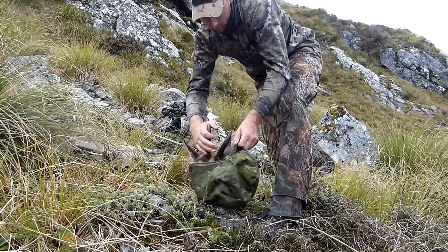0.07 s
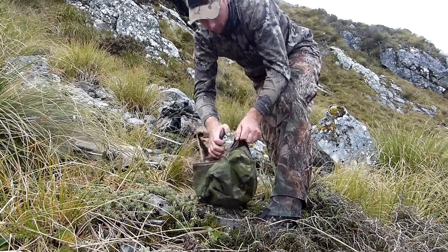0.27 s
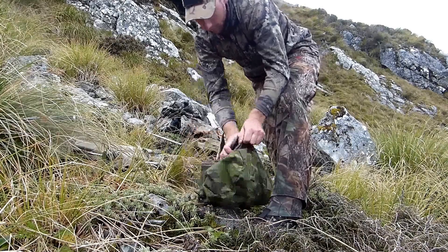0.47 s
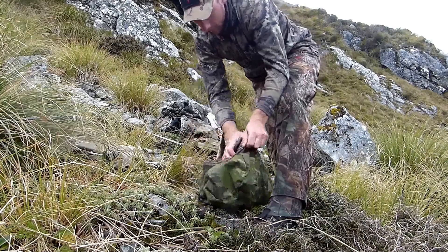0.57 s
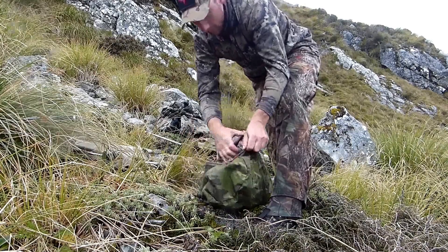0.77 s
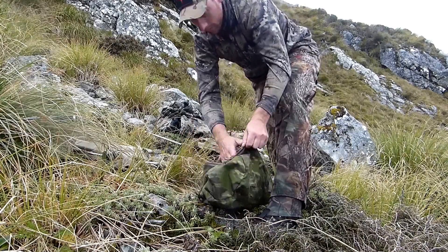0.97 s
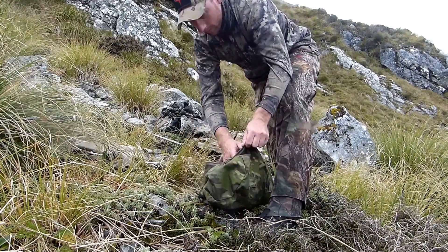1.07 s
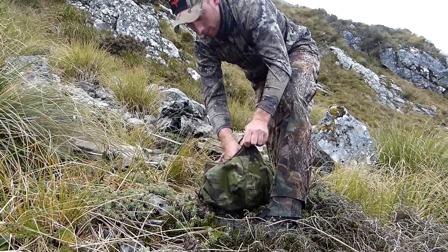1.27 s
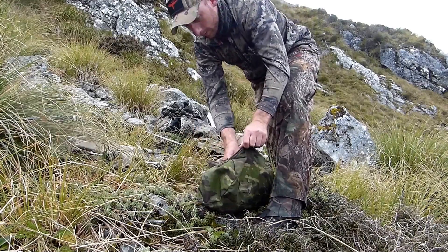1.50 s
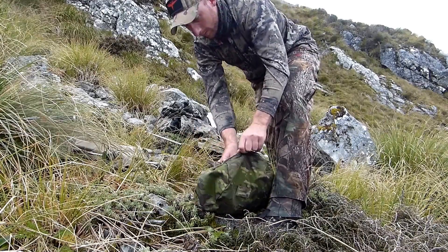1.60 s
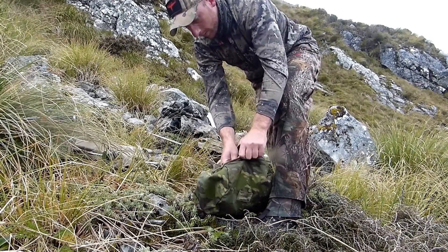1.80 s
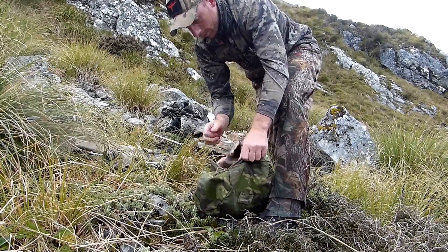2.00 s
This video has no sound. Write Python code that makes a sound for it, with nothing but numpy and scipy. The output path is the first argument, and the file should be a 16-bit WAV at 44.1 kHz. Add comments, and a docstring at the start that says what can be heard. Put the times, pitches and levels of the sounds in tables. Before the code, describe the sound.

A stiff fabric pack rustles as it is pulled shut a few steps away. Cloth slides in several strokes, a strap rasps briefly, then the load bumps dully and creases tick, in almost still mountainside air.

```python
"""Closing a fabric pack

A stiff pack is pulled shut a few steps away on an open mountainside, in almost still air.
Cloth slides on cloth in several strokes; its folds catch and slip, exciting the hollow of the pack.
Creases and dry grass tick, the load bumps dully and a strap rasps through once."""
import sys
import numpy as np
from scipy import signal
from scipy.fft import rfft, irfft, next_fast_len
from scipy.io import wavfile
from scipy.ndimage import map_coordinates

SR = 44100
rng = np.random.default_rng(int(sys.argv[2]) if len(sys.argv) > 2 else 0)


def store_wav(level_fs):
    """Save 16-bit WAV to argv[1]."""
    pcm = np.round(np.clip(np.atleast_2d(level_fs), -1, 1) * 32767)
    wavfile.write(sys.argv[1], SR, pcm.T.astype(np.int16))


N = 90404

# Spectral shapes of the air and of each kind of rubbing: frequency_hz, relative_db
AIR_SPECTRUM = [(25, -5), (60, -15), (150, -4), (300, -5), (400, 0.5), (500, 1), (750, 6), (1050, -4),
                (1500, -8), (3000, -19), (6000, -15), (11000, -17.5), (15500, -28)]
WEAVE_SPECTRUM = [(300, -101), (900, 14), (1500, -16), (2600, -1.5), (4000, 0), (6000, 0.5), (9000, -1.5),
                  (12000, -7.5), (14000, -16), (15700, -43)]
FOLD_SPECTRUM = [(60, -56), (110, -25.5), (175, -8.5), (310, -6), (470, -3), (620, -0.5), (820, -2),
                 (1030, -9), (1350, -5.5), (2000, -13.5), (4000, -18), (9000, -49)]
CREASE_SPECTRUM = [(300, -37), (700, 4), (1250, -2.5), (1850, 0), (2400, -8), (3300, -12), (4500, -24),
                   (12000, -38)]
STRAP_SPECTRUM = [(1000, -31), (3700, -19), (4170, 1.5), (4450, -13), (4750, -7), (6000, -13.5),
                  (8000, -23), (14000, -42)]
# Envelopes of the sliding weave and the tugged folds: time_s, relative_db
SLIDE_ENVELOPE = [(0, -71), (.15, -70), (.22, -58), (.28, -53), (.305, -46.5), (.41, -45.3), (.455, -58),
                  (.52, -60), (.585, -54), (.62, -57), (.72, -57), (.745, -67), (.795, -67), (.82, -58),
                  (.91, -55.7), (1.0, -61.5), (1.04, -59), (1.1, -67), (1.165, -68), (1.2, -57.5),
                  (1.3, -57), (1.345, -52), (1.435, -52), (1.465, -54), (1.49, -48), (1.52, -46),
                  (1.585, -50), (1.63, -57), (1.73, -65), (1.88, -64), (1.95, -69), (2.05, -69)]
TUG_ENVELOPE = [(0, -61.5), (.15, -59), (.25, -48.5), (.33, -46.5), (.4, -42), (.45, -47), (.52, -51.5),
                (.585, -44), (.68, -51.5), (.715, -46.5), (.76, -67), (.83, -53), (.99, -53), (1.04, -47.5),
                (1.1, -54.5), (1.16, -58), (1.22, -49.5), (1.3, -47), (1.39, -45), (1.47, -43),
                (1.51, -41.5), (1.58, -37.5), (1.62, -45), (1.68, -46.5), (1.72, -54.5), (1.79, -55.5),
                (1.88, -53.5), (1.94, -61.5), (2.05, -63)]
# Peaks and dips colouring the rustle, low pack resonances and a comb-like colouring higher up:
# centre_hz, width_hz, gain_db
RUSTLE_COLOURING = [(175, 35, 4.5), (332, 26, -6.5), (387.4, 45, 12.5), (595, 46, 2), (806.5, 32.4, 9.5),
                    (1008, 130, -2), (1219, 58, 7), (1473, 32, 4.5), (1833, 80, 5), (2075, 54, 5),
                    (2730, 42, 4), (3356, 47, 6.5), (4128, 73, 7.5), (4750, 70, 5.5)]
# Hard pulls that crunch the folds: peak_s, rise_s, fall_s, level_db
HARD_PULLS = [(.37, 0.11, 0.024, -49.5), (1.179, 0.0029, 0.019, -47), (1.239, 0.032, 0.024, -46.5),
              (1.38, 0.077, 0.055, -53.5), (1.519, 0.02, 0.026, -38), (1.585, 0.034, .008, -36.5),
              (1.675, 0.09, 0.014, -52.5), (1.805, 0.012, .015, -61), (1.887, 0.012, 0.0046, -54),
              (2.021, 0.0045, 0.01, -58)]
# Snaps of creases and dry grass: start_s, relative_db, centre_hz
SNAPS = [(0.136, -44.5, 6200), (0.2547, -38, 2580), (.299, -45, 4500), (.4095, -38, 4900),
         (0.4435, -40.5, 6000), (.4655, -41.5, 11500), (0.4648, -37.5, 1900), (.4795, -39.5, 4100),
         (1.3098, -37.5, 7340), (1.431, -37, 7100), (1.5195, -37, 1460), (1.6558, -38.5, 3860),
         (1.6825, -53, 2220), (1.6943, -41.5, 6640), (1.72, -47.5, 2470), (1.7593, -46, 3340),
         (1.796, -44.5, 6500), (1.809, -45.5, 6000), (1.8708, -41.5, 5740), (1.9245, -46.5, 6000),
         (1.967, -50.5, 6950), (2.008, -46, 6760), (2.019, -50, 7050)]
# Impacts of the load: start_s, relative_db, knock_pitch_ratio, thud_gain_db
LOAD_IMPACTS = [(0.4443, -38.5, 0.84, -1.5), (1.4768, -12.5, 0.98, -20.5), (1.4813, -25.5, 0.75, -26),
                (1.5592, -25, 0.87, -23), (1.5755, -22, 1.06, -27), (1.6552, -24.5, 1.09, -18),
                (1.6817, -32, 1.06, -12.5), (1.747, -31, 0.966, -7)]
# Modes that an impact excites: frequency_hz, relative_db, t60_s
KNOCK_MODES = [(589, -4.5, 0.026), (796, 0, .017), (1400, -13.5, 0.016)]
THUD_MODES = [(177, -2.3, 0.04), (285, -0.92, 0.03), (383.5, 0.23, 0.043)]
# Likeness of left and right: frequency_hz, coherence_ratio
AIR_COHERENCE = [(50, 1), (200, 0), (700, 0), (2000, 0), (5000, 0.07), (14000, .35)]
PACK_COHERENCE = [(50, .8), (150, 0.93), (290, 0.46), (640, 0.58), (1400, 0.99), (3100, 0.84), (6800, 0.89),
                  (14000, 0.66)]
# The pack's level, left minus right: frequency_hz, difference_db
EAR_BALANCE = [(50, -3), (160, 4.5), (350, 1.5), (650, -.5), (1100, -4.5), (2000, -4.5), (4000, -0.5),
               (12000, -2.2)]
# The pack's phase, left minus right: frequency_hz, lead_rad
EAR_PHASE = [(100, 0.59), (280, -0.4), (520, -1.35), (780, -0.65), (1500, -0.88), (2500, 0.38)]


def amp(db):
    """Amplitude grows tenfold every 20 dB."""
    return 10 ** (np.asarray(db) / 20)


def unit(x):
    """Normalisation to an rms of 1."""
    return x / np.sqrt(np.mean(x ** 2) + 1e-20)


def along(points, hz):
    """Interpolation on a logarithmic frequency axis."""
    frequencies, values = np.transpose(points)
    return np.interp(np.log(hz + 1), np.log(frequencies + 1), values)


def envelope(points):
    """Gain per sample, interpolated in decibels."""
    return amp(np.interp(np.arange(N) / SR, *np.transpose(points)))


def swell(peak_s, rise_s, fall_s, level_db):
    """Envelope of a stroke that builds up and lets go."""
    t = np.arange(N) / SR - peak_s
    return amp(level_db) * np.exp(-np.abs(t / np.where(t < 0, rise_s, fall_s)) ** 3.6)


def wobble(rate_hz):
    """Smooth modulation: a spline through random values."""
    return map_coordinates(rng.standard_normal(4096), [np.arange(N) * rate_hz / SR], mode="wrap")


def filtered(x, response):
    """Linear filtering multiplies the spectrum by a frequency response."""
    size = next_fast_len(N + SR // 2)
    return irfft(rfft(x, size) * response(np.fft.rfftfreq(size, 1 / SR)), size)[..., :N]


def spread(pair, coherence=PACK_COHERENCE):
    """Two independent signals, mixed as mid and side, give a partly coherent left and right."""
    angle = lambda hz: np.arccos(np.clip(along(coherence, hz), -1, 1)) / 2
    mid, side = filtered(pair, lambda hz: np.array([np.cos(angle(hz)), np.sin(angle(hz))]))
    return np.array([mid + side, mid - side])


def mountain_air():
    """Faint, steady broadband noise, largely incoherent between the ears above the bass."""
    noise = filtered(rng.standard_normal((2, N)), lambda hz: amp(along(AIR_SPECTRUM, hz)))
    return amp(-56) * unit(spread(noise, AIR_COHERENCE))


def friction(spectrum, slips_per_s, scatter_db, rub, clump_db, clump_hz):
    """Stick-slip friction: tiny uneven slips over a smooth rub, coloured by spectral peaks and dips."""
    slips = rng.random(N) < slips_per_s / SR
    sizes = amp(scatter_db * np.clip(rng.standard_normal(N), -2, 2))
    drive = unit(slips * sizes * rng.choice([-1, 1], (2, N))) + rub * rng.standard_normal((2, N))
    drive *= amp(clump_db * wobble(clump_hz))
    colour_db = lambda hz: sum(db / (1 + (2 * (hz - centre) / width) ** 2)
                               for centre, width, db in RUSTLE_COLOURING)
    return unit(spread(filtered(drive, lambda hz: amp(along(spectrum, hz) + colour_db(hz)))))


def cloth():
    """Friction makes the sliding weave hiss; folds rustle under tension and crunch in hard pulls."""
    hiss = friction(WEAVE_SPECTRUM, slips_per_s=3500, scatter_db=1, rub=0.94,
                    clump_db=1.07, clump_hz=300)
    rustle = friction(FOLD_SPECTRUM, slips_per_s=900, scatter_db=-1, rub=0.65,
                      clump_db=1.18, clump_hz=97)
    crunch = friction(CREASE_SPECTRUM, slips_per_s=1100, scatter_db=-0.5, rub=0.76,
                      clump_db=2.9, clump_hz=160)
    sliding = amp(4.5) * envelope(SLIDE_ENVELOPE)
    tugging = amp(-1) * envelope(TUG_ENVELOPE)
    pulling = sum(swell(*pull) for pull in HARD_PULLS)
    return sliding * hiss + tugging * rustle + pulling * crunch


def ticks(t60_s=0.023, width_octaves=0.84):
    """Creases and grass snap in broadband transients, each weighted by the weave's spectrum."""
    out, t = np.zeros((2, N + SR)), np.arange(2048) / SR
    hz = np.fft.rfftfreq(len(t), 1 / SR) + 1
    for start_s, db, centre_hz in SNAPS:
        band = np.exp(-.5 * (np.log2(hz / centre_hz) / width_octaves) ** 2)
        band *= amp(along(WEAVE_SPECTRUM, hz))
        snap = unit(irfft(rfft(rng.standard_normal((2, len(t)))) * band))
        out[:, round(start_s * SR):][:, :len(t)] += snap * amp(db - 4 - 60 * t / t60_s)
    return spread(out[:, :N])


def ring(modes, t, pitch_ratio=1):
    """Free vibration is a sum of exponentially damped modes."""
    return sum(amp(db + rng.normal(0, 1) - 60 * t / t60_s) * np.sin(2 * np.pi * hz * pitch_ratio * t)
               for hz, db, t60_s in modes)


def load_bumps(attack_s=0.0018, crack_t60_s=.005, low_cut_hz=119):
    """Impacts excite a damped knock, a thud and a slight crack; the pack radiates no deep bass."""
    out, t = np.zeros(N + SR), np.arange(SR // 5) / SR
    onset = 1 - np.exp(-(t / attack_s) ** 2)
    for start_s, db, pitch_ratio, thud_db in LOAD_IMPACTS:
        body = ring(KNOCK_MODES, t, pitch_ratio) + amp(thud_db) * ring(THUD_MODES, t)
        crack = amp(-28 - 60 * t / crack_t60_s) * rng.standard_normal(len(t))
        out[round(start_s * SR):][:len(t)] += amp(db) * (1.63 * onset * body + .5 * crack)
    return signal.sosfilt(signal.butter(4, low_cut_hz, "high", fs=SR, output="sos"), out[:N])


def ground_scatter(x, t60_s=.12):
    """Diffuse reflection from ground and rocks gives each ear its own short tail."""
    t = np.arange(SR // 4) / SR
    tail = rng.standard_normal((2, len(t))) * amp(-60 * t / t60_s)
    tail /= np.linalg.norm(tail[0])
    return amp(-13) * signal.fftconvolve(x[None], tail, axes=1)[:, :N]


def strap():
    """Rapid stick-slip of webbing makes one short, bright rasp."""
    rasp = friction(STRAP_SPECTRUM, slips_per_s=4000, scatter_db=2, rub=.8, clump_db=1.2, clump_hz=300)
    return swell(peak_s=.564, rise_s=.01, fall_s=.005, level_db=-37.5) * rasp


def scene():
    """The sources superpose; interaural level and phase set the pack slightly to the right."""
    bumps = load_bumps()
    pack = cloth() + strap() + ticks() + bumps + ground_scatter(bumps)
    ears = np.array([[.5], [-.5]])  # left, right
    placement = lambda hz: amp(ears * along(EAR_BALANCE, hz)) * np.exp(1j * ears * along(EAR_PHASE, hz))
    return filtered(pack, placement) + mountain_air()


def record(dry, top_hz=15750, dc_offset=-.0032):
    """An ideal low-pass limits the band; a constant offset shifts the wave slightly off zero."""
    return filtered(dry, lambda hz: hz < top_hz) + dc_offset


dry = scene()
out = record(dry)
store_wav(out)
```